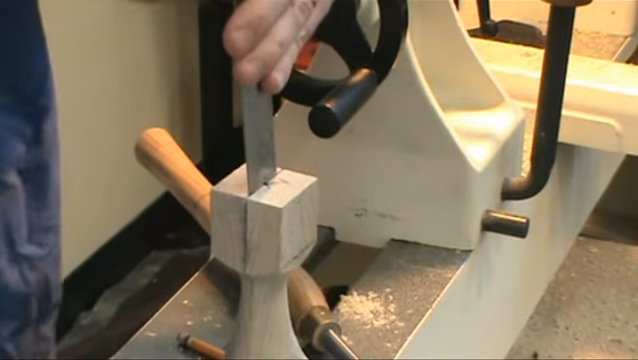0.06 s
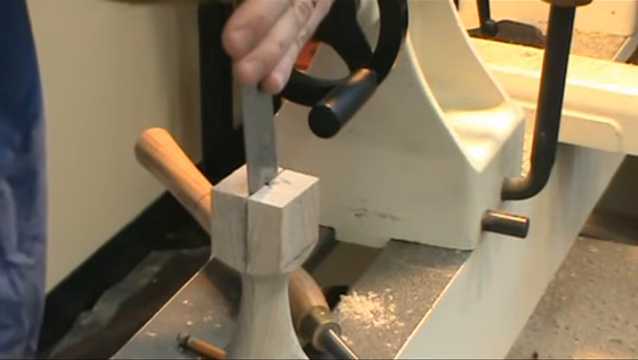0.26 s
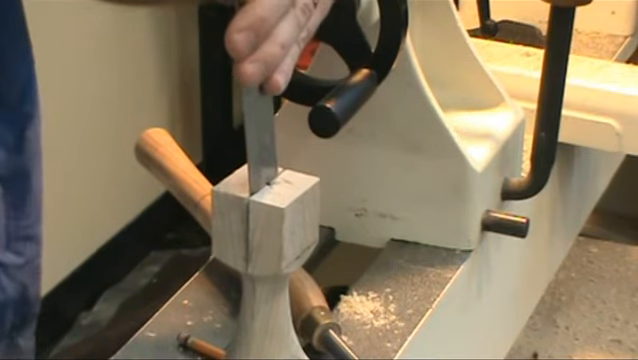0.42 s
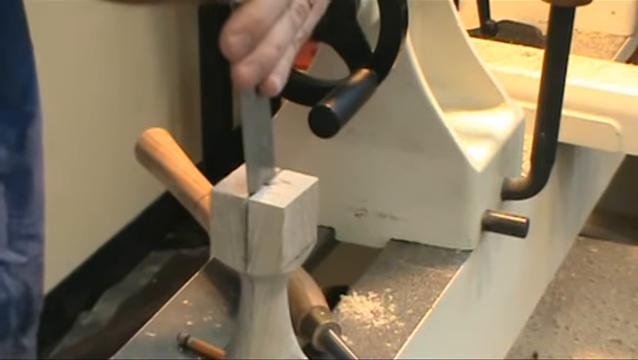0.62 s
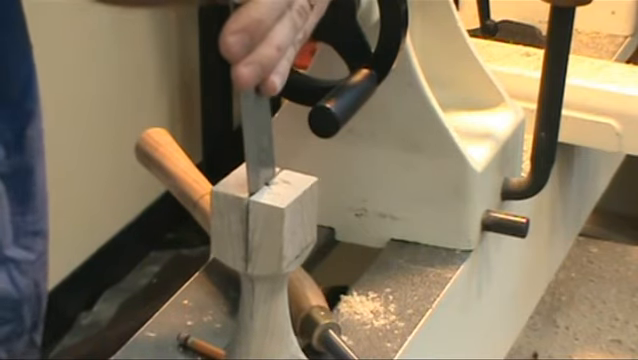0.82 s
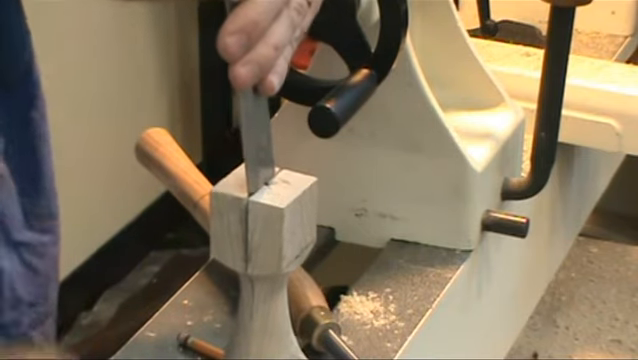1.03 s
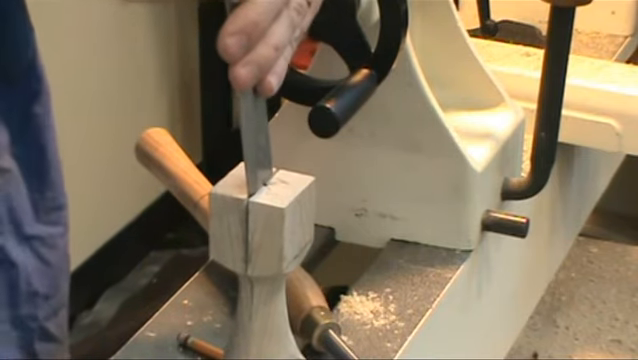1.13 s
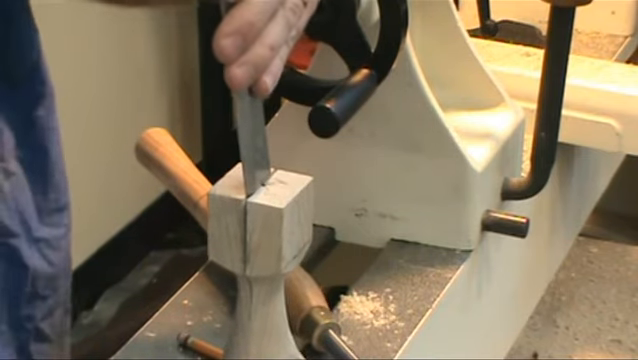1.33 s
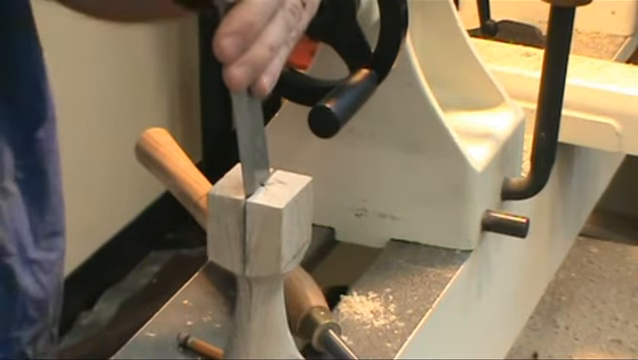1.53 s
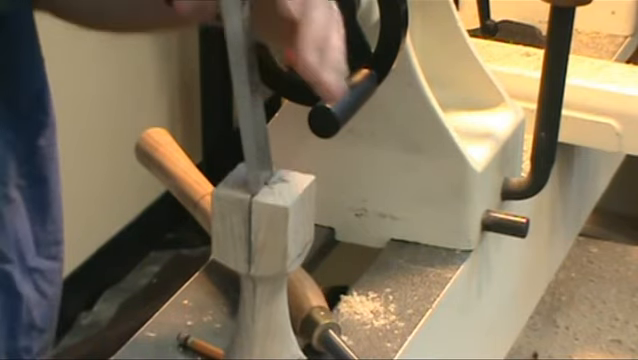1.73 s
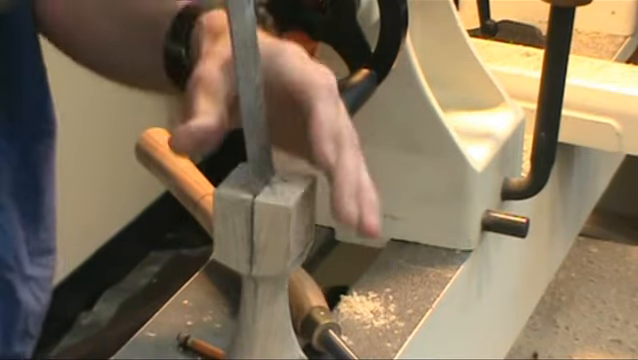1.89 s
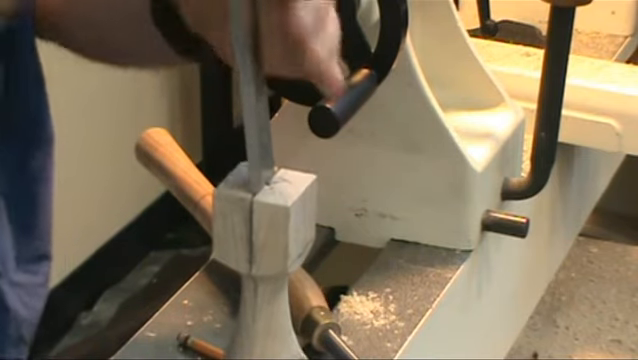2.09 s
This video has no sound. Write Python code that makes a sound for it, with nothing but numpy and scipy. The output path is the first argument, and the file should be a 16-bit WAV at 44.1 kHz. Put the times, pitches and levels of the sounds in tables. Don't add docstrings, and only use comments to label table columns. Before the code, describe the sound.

A mallet strikes a chisel into a wooden block three times, echoing, then soft thuds and rustling

```python
import sys
import numpy as np
from scipy import signal
from scipy.fft import rfft, irfft, next_fast_len
from scipy.io import wavfile
from scipy.ndimage import map_coordinates

SR = 44100
rng = np.random.default_rng(int(sys.argv[2]) if len(sys.argv) > 2 else 0)


def file_out(sig):
    cols = np.atleast_2d(sig).T
    lim = np.clip(cols, -1, 1)
    pcm = np.round(lim * 32767).astype(np.int16)
    wavfile.write(sys.argv[1], SR, pcm)


def ratio(d):
    e = np.asarray(d, float) / 20
    return 10 ** e


N = 94815


def unit(x):
    return x / np.sqrt(np.mean(x ** 2) + 1e-20)


def along(points, hz):
    f, v = np.transpose(points)
    return np.interp(np.log(hz + 1), np.log(f + 1), v)


def filtered(x, response):
    m = next_fast_len(x.shape[-1] + 8192)
    return irfft(rfft(x, m) * response(np.fft.rfftfreq(m, 1 / SR)), m)[..., :x.shape[-1]]


def wobble(rate, size):
    knots = rng.standard_normal(int(size * rate / SR) + 4)
    return map_coordinates(knots, [np.arange(size) * rate / SR])


def spread(pair, alike):
    def mid_and_side(hz):
        turn = np.arccos(np.clip(along(alike, hz), -1, 1)) / 2
        return np.array([np.cos(turn), np.sin(turn)])

    mid, side = filtered(pair, mid_and_side)
    return np.array([mid + side, mid - side])


def add(track, s, x):
    part = track[..., round(s * SR):][..., :x.shape[-1]]
    part += x[..., :part.shape[-1]]


# freq_hz, level_db
CRACK_SPECTRUM = [(600, -58.5), (1500, 10), (3000, -3), (4500, -0.5), (7000, -6), (10000, -4),
                  (13000, -11.5), (16000, -38)]


def crack_colour(f):
    return ratio(along(CRACK_SPECTRUM, f))


def crack(crack_db, t):
    length_s, t60_s = 0.0042, 0.022
    level_db = crack_db - 2.5 + 3.3 * wobble(1500, SR) - 60 * t / t60_s
    splinter = ratio(level_db) * np.exp(-(t / length_s) ** 6)
    return unit(filtered(rng.standard_normal(SR), crack_colour)) * splinter


# freq_hz, width_hz, level_db
WOOD_MODES = [(463, 170, 1.5), (1060, 210, -5), (1272, 84, 1), (1743, 110, 2), (2130, 150, -4.5),
              (2823, 156, -1.5), (3270, 365, -8.5), (3860, 740, -11.5), (4480, 600, -13),
              (5980, 1000, -20.5)]


def wood_jolt(lean_db, t):
    def body(f):
        total = 0
        for k, (hz, width, db) in enumerate(WOOD_MODES):
            resonance = 1j * f * width / (hz * hz - f * f + 1j * f * width)
            total = total + (-1) ** k * ratio(db + lean_db(hz)) * resonance
        return total

    return filtered(ratio(21) * (t == 0), body)


# freq_hz, level_db, t60_s
BED_MODES = [(464.3, -2, 0.39), (782, -14.5, 0.72), (1265, -1.5, 0.23), (1320, -7.5, 0.93),
             (1386.1, -6, 0.31), (1638, 2.5, 0.32), (1770, 0.5, 0.34), (1774, -12.5, 0.17), (2092, -5, 0.4),
             (2410, -14, 0.69), (931, -16, 1), (2682, -11, 0.63), (2900, -7.5, .4), (3220, -17, 0.77)]


def bed_ring(lean_db, t):
    level_db, rise_s, blur_rad, width_rad = -16.5, 0.0026, 0.75, 0.25
    ring = 0
    for hz, db, t60 in BED_MODES:
        envelope = ratio(db + lean_db(hz) + 4.6 * wobble(29.8, SR) - 60 * t / t60)
        side_phase = width_rad * rng.normal() * np.c_[[1, -1]]
        ring = ring + envelope * np.sin(2 * np.pi * hz * t + blur_rad * wobble(20.1, SR) + side_phase)
    return ring * ratio(level_db) * (1 - np.exp(-t / rise_s))


def stand_shake(t):
    centre_hz, width_hz, level_db, t60_s, rise_s = 120, 30, -30, 4.7, 0.043
    shake = filtered(rng.standard_normal(SR), lambda f: 1 / (1 + ((f - centre_hz) / width_hz) ** 4))
    envelope = ratio(level_db - 60 * t / t60_s) * (1 - np.exp(-t / rise_s)) * np.cos(np.pi * t / 2)
    return envelope * unit(shake)


WALL_S = 0.0356


def wall_slap(crack_sound, wood, t):
    spread_s, size = 0.004, SR // 20
    smear = rng.standard_normal((2, size)) * ratio(-60 * t[:size] / spread_s)
    smear = spread(smear / np.linalg.norm(smear[0]), [(1000, 0.91)])
    arriving = crack_sound * ratio(-60 * t / 0.03) + 0.53 * wood
    return ratio(-5.5) * signal.fftconvolve(arriving[None], smear, axes=1)


# freq_hz, t60_s
HALL_DECAY = [(200, 1.38), (500, 1.06), (1400, 0.88), (3500, 0.92), (7000, 0.52), (12000, 0.23)]
# freq_hz, likeness
HALL_ALIKE = [(60, 1), (240, 0.75), (950, 0.45), (3770, 0.516), (15000, 0.143)]


def hall(x):
    rise_s, wall_swell_db = 0.0036, 2.5
    hz, t, z = signal.stft(rng.standard_normal((2, SR * 3 // 2)), SR, nperseg=256)
    decay = ratio(-60 * t / along(HALL_DECAY, hz)[:, None])
    tail = signal.istft(z * decay, SR, nperseg=256)[1]
    t = np.arange(tail.shape[1]) / SR
    build_up = (1 - np.exp(-t / rise_s)) * ratio(wall_swell_db * (t > WALL_S))
    tail = spread(tail * build_up, HALL_ALIKE)
    return signal.fftconvolve(x[None], tail / np.linalg.norm(tail[0]), axes=1)


# start_s, level_db, crack_db, hall_db
BLOWS = [
    (0.2395, -7.5, -4, -3),
    (0.4686, -9, 3, 1),
    (0.6881, -8.5, 4, 1.5),
]
GRIP_HZ = [480, 1000, 1300, 1700, 2150, 2900]
GRIP_DB = [(2.6, 4.2, 2.42, 2.5, 2, 6.36), (1.5, 6, 4, 5, 4.9, 6.2), (0.73, 4.1, 4.3, 5.8, 1.58, 5.5)]


def blows():
    hall_gain_db, far_snap_db, far_snap_hz = 9, 9, 6200
    out, t = np.zeros((2, N)), np.arange(SR) / SR
    for (s, db, crack_db, hall_db), grip in zip(BLOWS, GRIP_DB):
        lean_db = lambda hz: along(list(zip(GRIP_HZ, grip)), hz)
        crack_sound = crack(crack_db, t)
        wood = wood_jolt(lean_db, t)
        add(out, s, ratio(db) * (crack_sound + wood + bed_ring(lean_db, t)))
        add(out, s, ratio(db) * stand_shake(t))
        add(out, s + WALL_S, ratio(db) * wall_slap(crack_sound, wood, t))

        snap = filtered(ratio(crack_db - 1) * (t == t[SR // 1000]), crack_colour)
        far_snap = filtered(snap, lambda f: 1 / (1 + (far_snap_hz / (f + 1)) ** 4))
        wet_db = db + hall_db + hall_gain_db
        add(out, s, ratio(wet_db) * hall((wood + snap)[:SR // 5]))
        add(out, s + WALL_S - 0.008, ratio(wet_db + far_snap_db) * hall(far_snap[:SR // 5]))
    return out


# start_s, level_db, pitch_hz, t60_s
THUDS = [(1.045, -35, 287, 0.15), (1.065, -32, 171, 0.13), (1.2203, -22, 172, 0.04),
         (1.2184, -30.5, 307, 0.096), (1.222, -33, 472.6, 0.14), (1.29, -32.5, 102, 0.13),
         (1.376, -31, 404, 0.0415), (1.378, -38, 97, 0.42), (0.505, -28, 313.2, 0.16),
         (0.725, -29.5, 303, 0.11), (0.24, -18, 1060, 0.053), (0.24, -23.5, 454, 0.12),
         (1.589, -33.5, 53, 0.17), (1.94, -34.5, 90.6, 0.066), (2.06, -42, 97, 0.11)]


def thuds():
    out, t = np.zeros(N), np.arange(SR // 2) / SR
    for s, db, hz, t60 in THUDS:
        onset = 1 - np.exp(-t / 0.0005)
        add(out, s, -ratio(db - 60 * t / t60) * np.sin(2 * np.pi * hz * t) * onset)
    return out + ratio(-4) * hall(out)[:, :N]


RUB_S = [0.01, 1.113, 1.217, 1.2205, 1.2205, 1.28, 1.303, 1.308, 1.35, 1.382, 1.402, 1.405, 1.414, 1.429,
         1.458, 1.466, 1.49, 1.512, 1.513, 1.589, 1.65]
# level_db, rise_ms, fall_ms, centre_hz
RUBS = [(-45.5, 49, 140, 390), (-38.5, 3.7, 11, 3500), (-40, 0.93, 3.2, 11400), (-38, 0.96, 6.4, 2300),
        (-40, .6, 18, 1250), (-48.5, 120, 170, 900), (-47, 1.7, 6.7, 10200), (-41, 3.7, 4.7, 1900),
        (-50, 25, 59, 10130), (-43.5, 2.2, 5, 1800), (-45, 9.2, 18, 4100), (-35.5, 10.3, 11, 11200),
        (-35, 6.8, 6.1, 1010), (-42.5, 1.1, 3.45, 12500), (-34, 1.8, 6.3, 10200), (-47.5, 12, 20, 2840),
        (-48, 31, 58, 9400), (-47.5, 9.1, 13, 4200), (-38.5, 6.6, 6.4, 10700), (-47.5, 4.5, 8.7, 9900),
        (-51.5, 23.8, 25, 8700)]


def scuffs():
    width_octaves, grain_db = 0.58, 3
    out, ms = np.zeros((2, N)), np.arange(N) / SR * 1000
    for s, (db, rise, fall, hz) in zip(RUB_S, RUBS):
        band = lambda f: np.exp(-0.5 * (np.log2((f + 1) / hz) / width_octaves) ** 2)
        noise = unit(filtered(spread(rng.standard_normal((2, N)), [(1000, 0.76)]), band))
        late = ms - s * 1000
        stroke = np.exp(-np.abs(late) / np.where(late < 0, rise, fall))
        out += ratio(db + grain_db * wobble(700, N)) * stroke * noise
    return out


# start_s, length_s, level_db, pitch_hz, glide_hz_per_s
SQUEAKS = [
    (1.955, .075, -66, 8650, 900),
    (1.99, .09, -63, 2960, -600),
]


def squeaks():
    out = np.zeros(N)
    for s, length, db, hz, glide in SQUEAKS:
        t = np.arange(round(length * SR)) / SR
        pitch = hz * (1 + 0.005 * wobble(60, len(t))) + glide * t
        swell = np.sin(np.pi * t / length) ** 0.5
        add(out, s, ratio(db) * swell * np.sin(2 * np.pi * np.cumsum(pitch) / SR))
    return out


# time_s, level_db
AIR = [(0, -44), (.1, -45), (.5, -46), (1.0, -45), (1.4, -45), (1.75, -47), (2.15, -46)]
# freq_hz, level_db_per_hz
RUMBLE = [(10, -34), (22, -6), (45, -5.5), (95, -6.5), (160, -9), (400, -17.5), (600, -22), (1200, -35),
          (2600, -120)]
# freq_hz, level_db_per_hz
HISS = [(470, -48), (800, -2.5), (1500, -1), (3000, -5), (8100, -12.5), (11000, -7), (15500, -14.5),
        (16500, -28)]
# freq_hz, likeness
ALIKE = [(30, 0.99), (180, 0.98), (550, 0.89), (1650, 0.48), (5000, 0.52), (15000, 0.71)]


def background():
    def coloured(spectrum):
        noise = filtered(rng.standard_normal((2, N)), lambda f: ratio(along(spectrum, f)))
        return unit(spread(noise, ALIKE))

    t = np.arange(N) / SR
    air_s, air_db = np.transpose(AIR)
    lumps_db = 0.96 * wobble(8.27, N) + 4.1 * wobble(30.13, N)
    rumble = coloured(RUMBLE) * ratio(np.interp(t, air_s, air_db) - 1.5 + lumps_db)
    hiss = coloured(HISS) * ratio(-53.5 + 1.5 * wobble(5.22, N))
    whine = ratio(-58.5) * np.sin(2 * np.pi * 15734.3 * t)
    return rumble + hiss + whine


def scene():
    low_cut_hz, left_db = 78.5, 0.55
    struck = filtered(blows(), lambda f: 1j * f / (low_cut_hz + 1j * f))
    near = struck + thuds() + scuffs() + squeaks()
    return near * ratio([[left_db], [-left_db]]) + background()


def low_pass(x):
    return signal.sosfilt(signal.butter(12, 16800, fs=SR, output="sos"), x)


def record(dry):
    ceiling, knee, top_hz = 0.8, 3, 16200
    x = dry / (1 + np.abs(dry / ceiling) ** knee) ** (1 / knee)
    mix = filtered(x, lambda hz: 1 / (1 + (hz / top_hz) ** 60))
    return low_pass(mix)


dry = scene()
out = record(dry)
file_out(out)
```